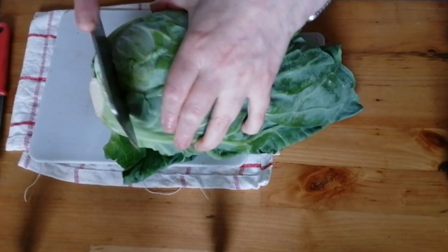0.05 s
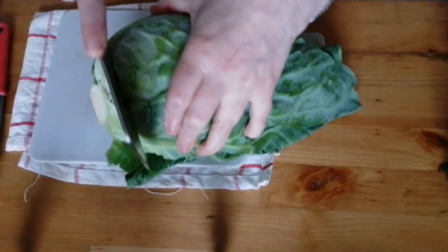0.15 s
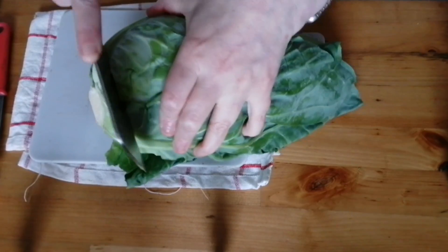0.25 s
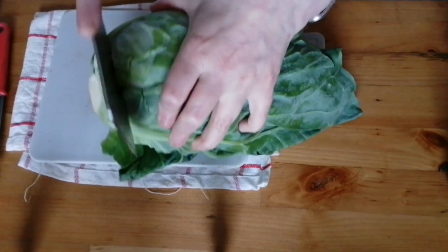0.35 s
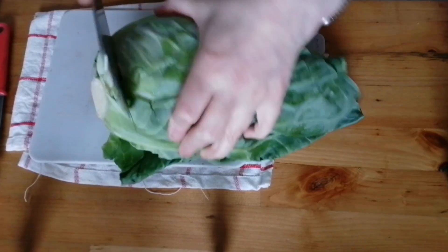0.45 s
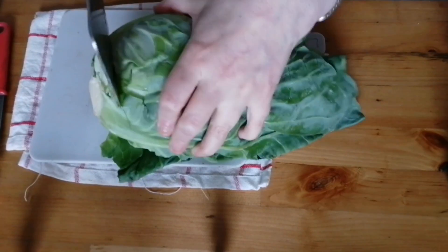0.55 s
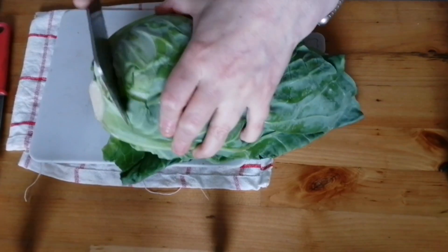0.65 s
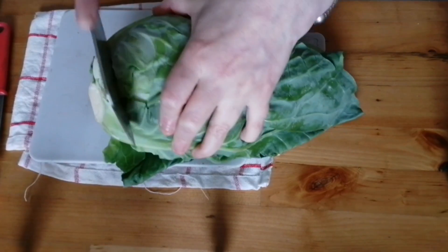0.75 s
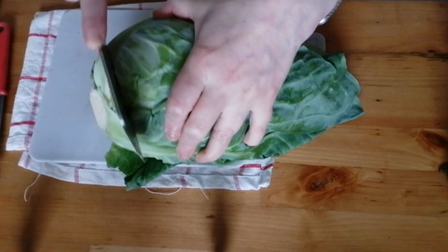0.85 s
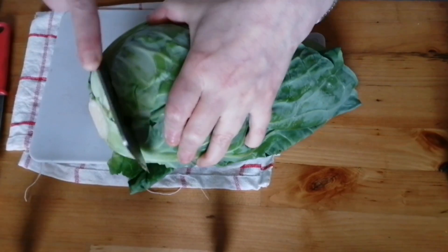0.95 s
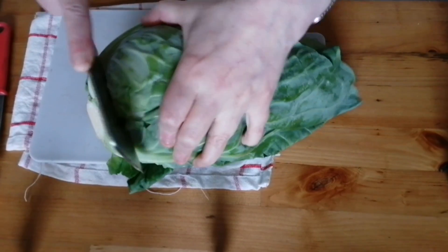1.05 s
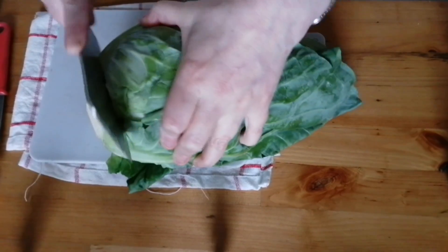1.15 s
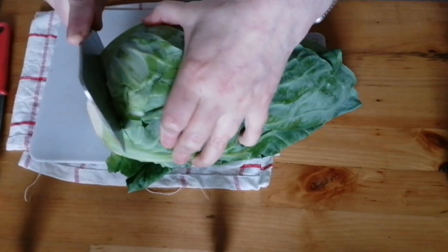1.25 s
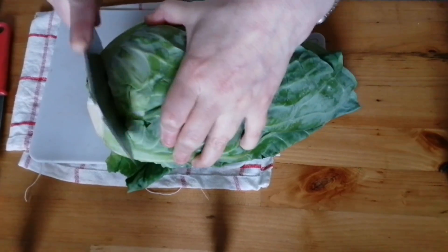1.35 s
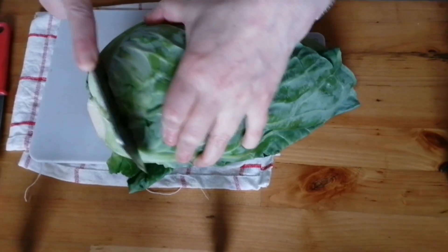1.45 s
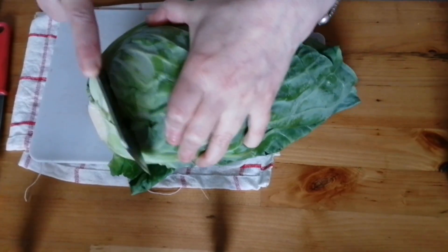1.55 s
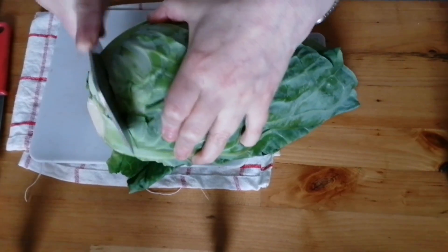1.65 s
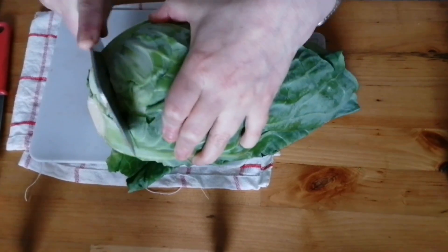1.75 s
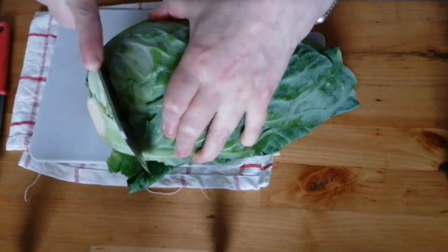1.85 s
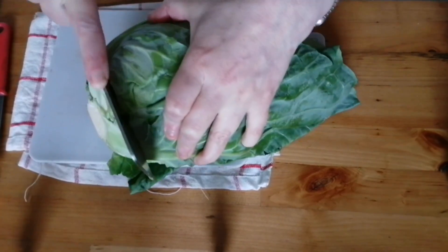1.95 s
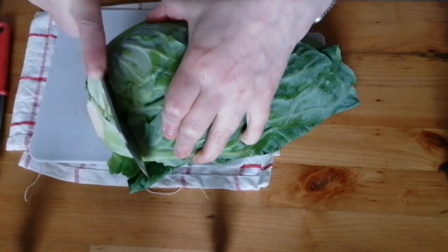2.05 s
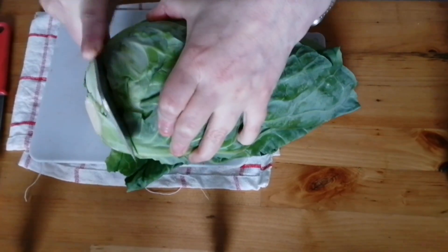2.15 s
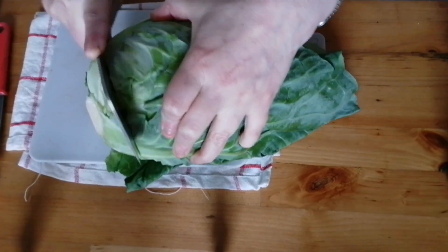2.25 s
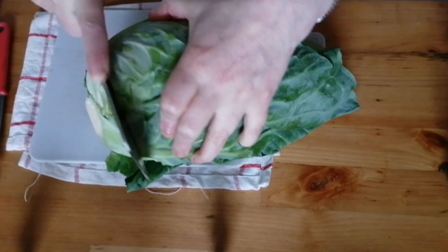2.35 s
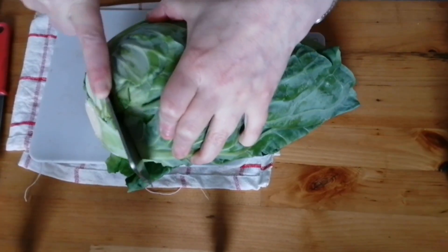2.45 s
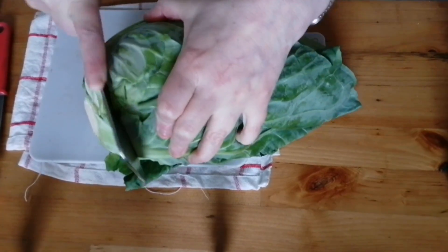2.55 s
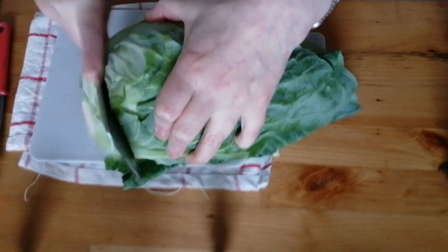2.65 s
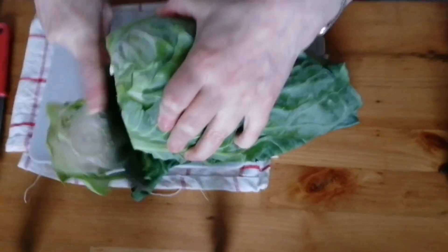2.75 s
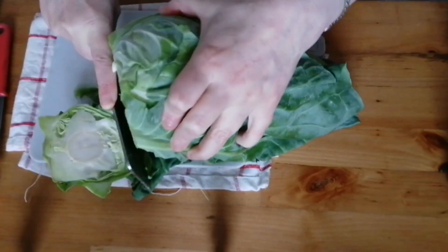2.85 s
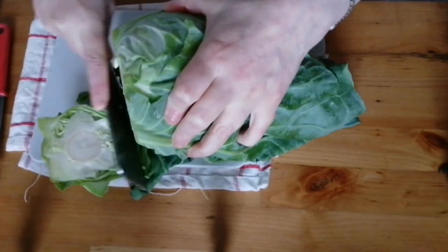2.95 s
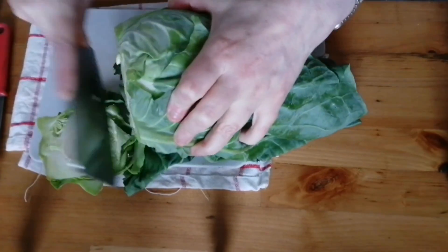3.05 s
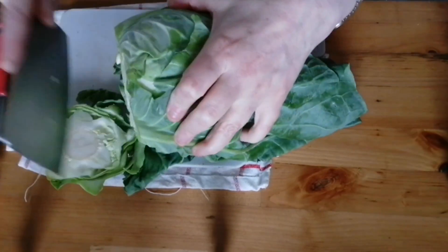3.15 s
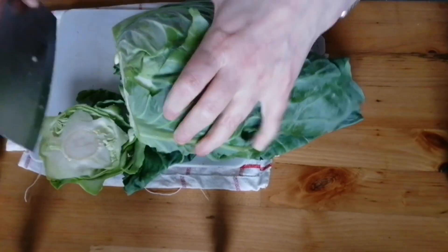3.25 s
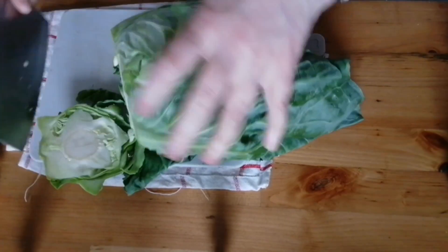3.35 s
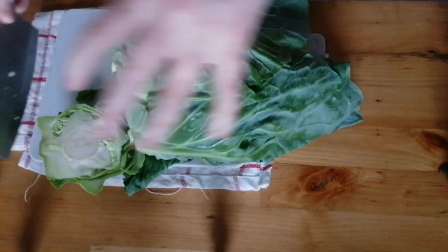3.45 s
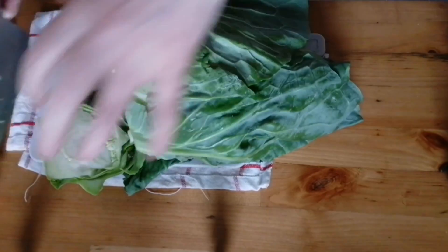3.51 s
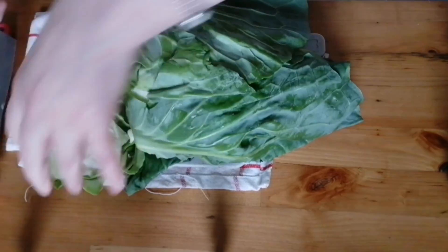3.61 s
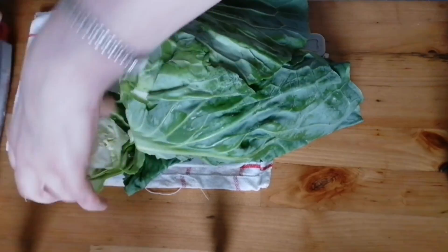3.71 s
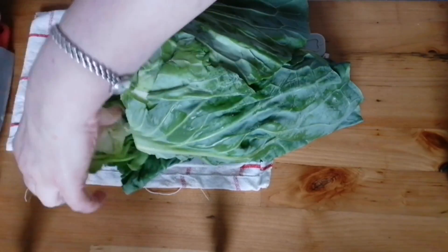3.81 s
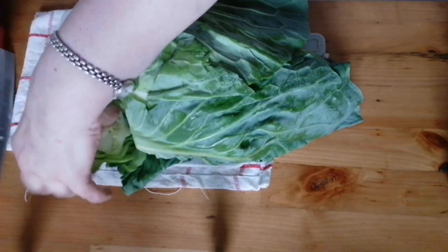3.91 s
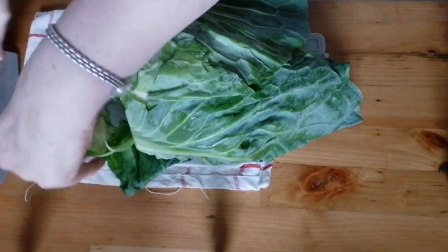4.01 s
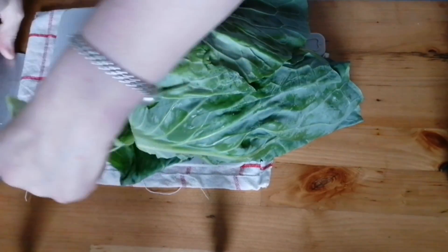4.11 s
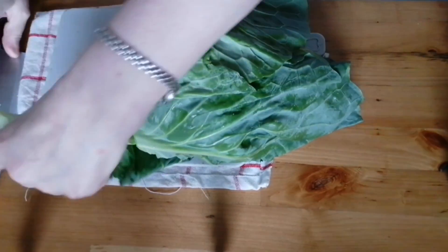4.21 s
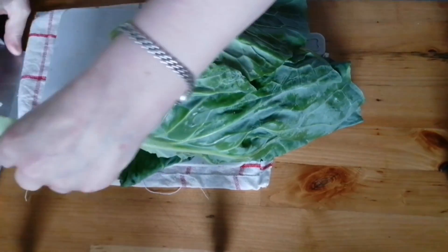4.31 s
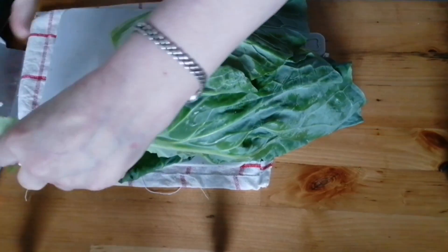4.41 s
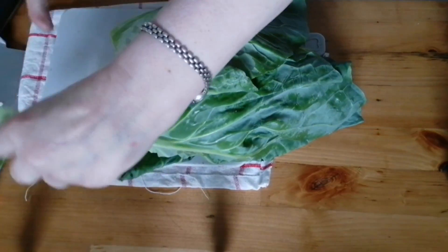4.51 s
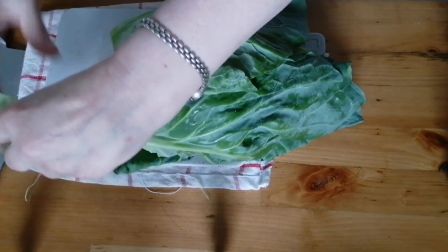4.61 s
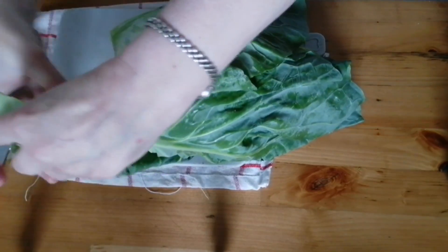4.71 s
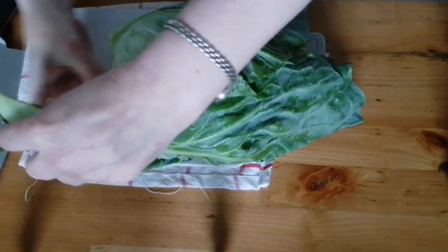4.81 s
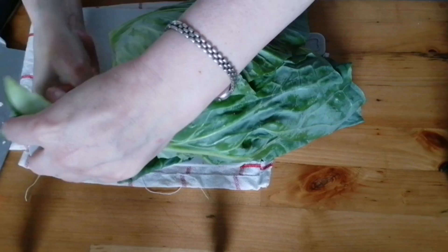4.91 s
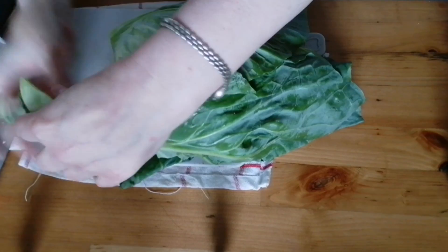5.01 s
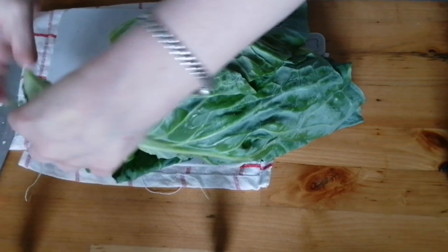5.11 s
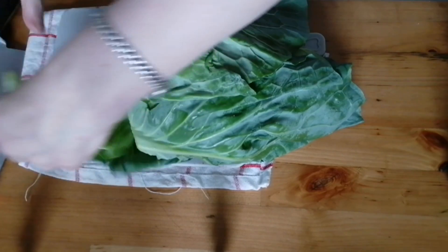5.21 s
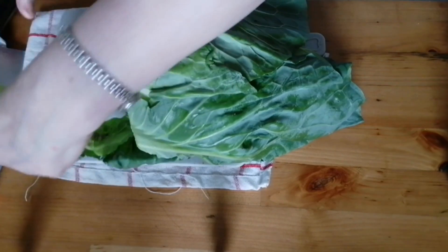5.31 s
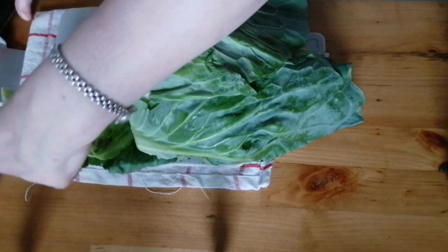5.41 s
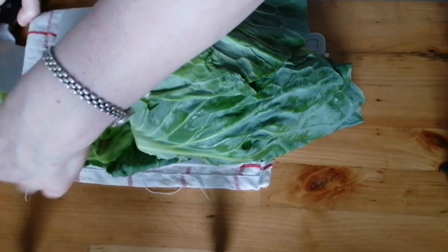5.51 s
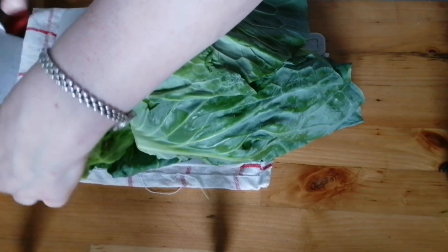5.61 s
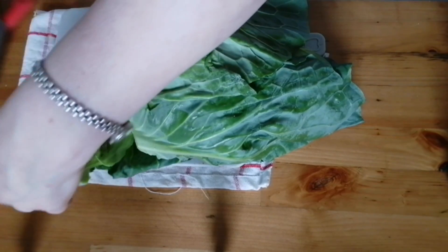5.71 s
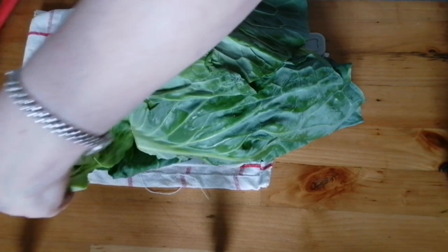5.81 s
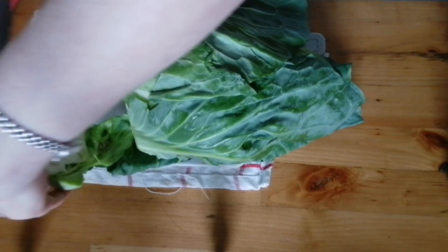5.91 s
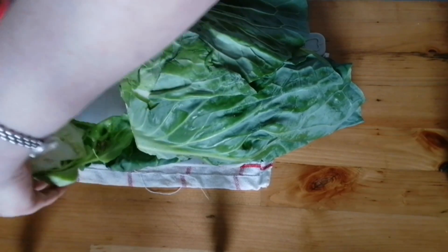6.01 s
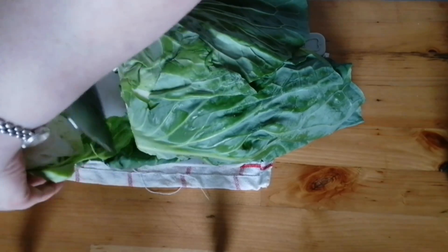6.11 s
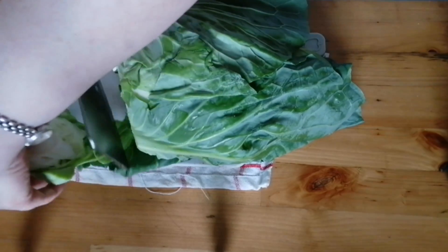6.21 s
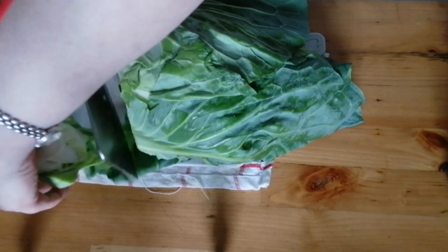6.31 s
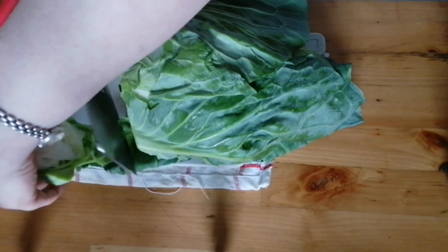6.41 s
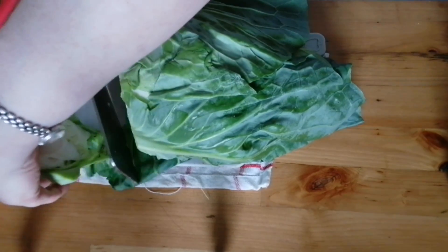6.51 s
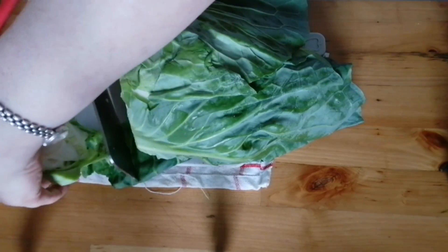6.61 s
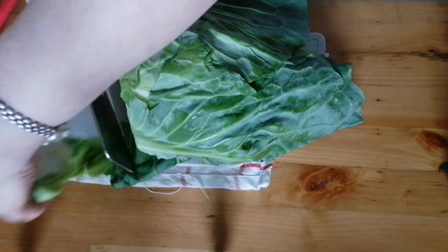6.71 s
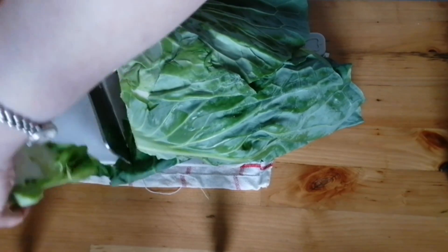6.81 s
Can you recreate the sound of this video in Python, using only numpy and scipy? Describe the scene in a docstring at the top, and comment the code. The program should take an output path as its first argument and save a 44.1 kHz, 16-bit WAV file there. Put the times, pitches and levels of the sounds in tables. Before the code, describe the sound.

Crisp, ragged cutting strokes through firm cabbage end in a loud crack, followed by board knocks, a steel clink and faint leafy snaps.

```python
"""A knife saws through a cabbage stalk: random grains of noise crackle as cells burst, and leaf scraps resonate.
Leaf ribs snap in filtered noise bursts, and blows excite damped modes of a plastic board and, under a towel, a table.
The blade is laid down with a clink, the stump is moved, and the knife is slid off and taken up: the steel rings.
A kitchen's decaying reverberation answers the work, over soft room noise that dips and returns, a faint hum
and a low drone that rises and falls, strongest near 1.3 s."""
import sys
import numpy as np
from scipy import signal
from scipy.fft import rfft, irfft
from scipy.io import wavfile
from scipy.ndimage import uniform_filter1d

SR = 44100
rng = np.random.default_rng(int(sys.argv[2]) if len(sys.argv) > 2 else 0)


def pcm_store(signal):
    """Save signal as 16-bit PCM."""
    levels = np.round(np.clip(np.atleast_2d(signal), -1, 1) * 32767)
    wavfile.write(sys.argv[1], SR, levels.astype(np.int16).T)


N = 302526
TIME = np.arange(N) / SR
AGE = TIME[:SR // 2]  # time since a hit

# Levels in the tables are relative: each source and the room weight them further.
# ribs snapping: start_s, level_db, pitch_hz, lean_db (left minus right, scaled in use), pop_db (hollow head)
RIB_SNAPS = [(.33, -36, 7270, -4, -10), (0.3463, -32.5, 5610, 3, -4.5), (0.7499, -27, 6650, 5, -13),
             (0.7696, -32.5, 6540, 1, -3), (0.833, -34.5, 5250, 11, -25), (0.9283, -35, 3250, 6, -3.5),
             (0.9802, -31.5, 7200, 4, -6.5), (1.0916, -32.5, 6450, -7, -15), (1.1097, -37.5, 2800, 15, -23),
             (1.1394, -32, 2150, 0, -11), (1.176, -35.5, 6350, 9, -21), (1.4569, -33, 5500, 12, -8),
             (1.5488, -27.5, 6660, 1, -5.5), (1.71, -37.5, 6650, 3, -7), (1.8133, -34.5, 5420, 6, -25),
             (1.8463, -32, 7100, 22, -16), (1.8617, -28.5, 5100, -5, -27), (1.9778, -29.5, 6940, 17, -18),
             (2.009, -28, 6460, -1, -30), (2.0862, -30, 8000, -4, -2.5), (2.21, -30, 2800, 3, -10),
             (2.234, -27, 8950, -2, -3.5), (2.2554, -32, 5170, 4, -8), (2.2887, -26, 7260, 6, -1.5),
             (2.378, -29.5, 2340, 11, -5.5), (2.4995, -28.5, 5500, 13, -13), (2.524, -27, 6600, -10, -34),
             (2.7738, -34.5, 2620, 10, -29), (2.826, -23, 2930, 8, -9.5), (2.8567, -19, 5050, 0, -4),
             (2.9134, -27.5, 6060, -12, -18), (3.1362, -38.5, 5500, 7, 2.5), (3.3466, -45, 4810, 2, -30),
             (3.481, -45, 6830, 6, -19), (3.6712, -44.5, 2930, 9, -6), (4.6265, -47.5, 2480, -10, -16),
             (4.6757, -40, 2150, 1, -3.5), (4.7555, -53, 2050, 0, 3), (5.016, -52, 3170, -2, -9),
             (5.475, -55.5, 2200, -1, 0), (6.697, -36, 3330, -12, -29)]
# blows on the board: start_s, board_db, table_db, contact_db (hard clack)
BOARD_BLOWS = [(0.4312, -39, -54, -35), (1.459, -51, -72, -46.5), (2.235, -52, -48, -50),
               (2.291, -49, -50.5, -46), (2.389, -25, -49, -39.5), (2.403, -38, -44, -62),
               (2.9027, -25, -27.5, -26.5), (2.923, -27, -42, -41), (3.929, -37, -59, -48),
               (3.9543, -23.5, -41, -31.5), (4.029, -38, -58, -49), (4.179, -36, -57, -73),
               (4.277, -35.5, -53, -78), (4.304, -31, -46.5, -51), (5.789, -46, -63, -44),
               (5.827, -41, -52.5, -40), (5.844, -42.5, -59, -50), (5.866, -41.5, -53, -46),
               (5.894, -48.5, -73, -39), (6.722, -37.5, -37.5, -32)]
# blade touching down or lifting: start_s, level_db, lean_db (left minus right), ring_db,
# tilt_db (of the ring, per octave), bright_db (treble of the contact)
BLADE_CLINKS = [(3.928, -29, 0.5, -11, -3, 3.5), (4.202, -38.5, 4, -19, -10, 0),
                (4.3036, -25, 0.5, -6, 8.5, -0.5), (5.697, -49.5, -1, -6, 3, -7),
                (5.7416, -42.5, 2.5, -5, -1, -7)]
# normal modes of the plastic board, the table top and the blade: pitch_hz, level_db, t60_s
BOARD_MODES = [(183.6, -24, 0.09), (248.5, -4.5, 0.19), (299.5, 0.5, 0.058), (363.5, 7, 0.058),
               (451, 4, 0.055), (560, -15, 0.034), (664, -12, 0.15), (904, -37, 0.064), (987, -35, .07),
               (1350, -43, .07), (1640, -16, 0.067), (2000, -30, 0.07)]
TABLE_MODES = [(67, 2, 0.09), (88, 7.5, 0.047), (111.5, 2.5, 0.085), (156.6, -6.5, 0.19)]
BLADE_MODES = [(2745, -14, .2), (5500, -11, .14), (6038, 0, .28), (6072, -12, .35), (7950, -13, .25),
               (8010, -11, .32), (8850, -15, .2), (10050, -17, .2), (11550, -22, .15), (13150, -23, .14),
               (14870, -18, .09)]
# spectral shapes of bursting cells, hollow head, friction, hard contact, steel and room noise: pitch_hz, gain_db
CELL_COLOUR = [(300, -34.5), (900, 2), (1500, -2.5), (2100, -4.5), (2900, 2.5), (3900, -7), (5300, 1.5),
               (7000, 2.5), (8700, -1.5), (11000, -10.5), (15000, -18)]
HEAD_COLOUR = [(150, -6), (400, -5), (900, 2.5), (1500, 2.5), (2800, 1), (4000, -14), (9000, -47)]
FRICTION_COLOUR = [(50, -5), (120, 3), (210, 6.5), (400, 2), (580, 8.5), (950, -3), (1500, -15),
                   (3000, -16), (8000, -37.5)]
CONTACT_COLOUR = [(300, -17), (700, 5), (1000, 4.5), (1600, -8), (2200, -13), (2800, -11.5), (4000, -25.5),
                  (7000, -23), (14000, -52)]
STEEL_COLOUR = [(300, -46), (900, 9.5), (2000, -2.5), (2900, 5), (3900, -7.5), (5400, 7), (7800, 4.5),
                (9500, -2), (12500, -10.5), (15000, -7)]
AIR_COLOUR = [(20, -0.5), (42, -19.5), (65, -6), (130, -4.5), (200, -2), (280, -8.5), (370, -4.5),
              (680, -3), (1300, -15), (2100, -22), (3000, -24.5), (3900, -34.5), (5400, -30.5), (7200, -30),
              (10500, -43), (15000, -40.5)]
# envelope of the low drone: time_s, level_db
DRONE_ENVELOPE = [(0, -61), (.25, -58), (.42, -70), (.66, -65), (.95, -48), (1.3, -45), (1.62, -59),
                  (2.2, -65), (3.2, -71), (3.68, -60), (3.95, -72), (4.72, -89), (4.88, -59), (5.05, -66),
                  (5.4, -75), (6.86, -99)]
# spectral lines of the drone: pitch_hz, level_db
DRONE_LINES = [(42.3, -0.5), (85.5, -13), (119, -19.5)]
# envelope of the room noise: time_s, level_db
AIR_ENVELOPE = [(0, -55), (1.9, -58.5), (2.7, -59), (3.6, -56), (6.86, -56)]
# response difference of the two microphones: pitch_hz, left_minus_right_db
MICROPHONE_BALANCE = [(60, 2.5), (130, -0.5), (450, -1.5), (1000, -3), (2200, .5), (3600, -1), (5400, 4),
                      (6500, 3.5), (8000, -5), (9500, -7.5), (12000, -0.5), (15000, 1.5)]
# reverberation of the kitchen: pitch_hz, t60_s, level_db
ROOM_DECAY = [(60, 0.18, 2), (155, 0.6, -2), (400, 0.52, -2), (1190, 0.53, 0), (2980, 0.57, -1),
              (6800, 0.56, -4), (14300, 0.34, -2)]
# pushes of blade or fingers that burst cells: start_s, length_s, level_db, swell_db (start to end), fizz_db
PUSHES = [(0.0, 0.052, -38, -13, -19), (0.105, 0.19, -58.5, 9, -18), (0.298, 0.047, -40.5, 8.5, -10.5),
          (0.491, 0.11, -42, -6.5, -19), (0.614, .055, -42.5, 8, -11.5), (0.752, 0.11, -45.5, 6, -15),
          (0.929, 0.11, -46.5, 2, -15), (1.043, 0.079, -50, -8, -10), (1.277, 0.1, -45.5, 1.5, -14),
          (1.456, .05, -43, -3, -15), (1.551, .095, -55, 8, -7), (1.695, .02, -46, 1, -18),
          (1.765, 0.072, -45, 6, -10), (1.973, 0.1, -51.5, 9, -7), (2.084, 0.06, -41.5, 0, -13),
          (2.23, 0.1, -46, -1, -16), (2.304, 0.044, -48.5, 7, -12), (2.527, 0.07, -47, 7, -8.5),
          (2.846, 0.068, -32.5, 3, -11.5), (3.129, 0.077, -48.5, -2, -13.5), (3.263, 0.21, -57, 2, -15),
          (3.551, 0.066, -59.5, -7, -14), (4.652, 0.04, -56.5, 6, -12), (4.992, 0.027, -66, -2, -12),
          (5.129, 0.023, -63.5, 0, -13), (5.64, 0.078, -61, 8, -16), (6.498, .02, -61, 0, -13)]
# cabbage or knife dragged over the board: start_s, length_s, level_db, swell_db (start to end)
DRAGS = [(0.0, 0.021, -39, -1), (0.307, 0.057, -45.5, 2.5), (0.502, 0.066, -44, -6),
         (0.652, 0.16, -47.5, 1), (0.94, 0.054, -61, -3), (1.298, .05, -50, -1), (1.459, 0.028, -40.5, -9),
         (1.761, 0.084, -49.5, -9), (2.081, 0.061, -45.5, -1), (2.274, 0.066, -48, 8),
         (2.85, 0.059, -39.5, 11), (3.055, 0.091, -42, 6), (3.984, 0.059, -39.5, 12.5),
         (4.428, 0.055, -46, -1), (4.85, .02, -52, 2), (5.653, 0.037, -48, 2), (5.813, .15, -47, -5)]
# blade sliding on the board: start_s, length_s, level_db, swell_db (start to end)
SLIDES = [(4.335, 0.072, -55, -8), (5.76, 0.11, -59, 0), (5.881, 0.058, -60, -3)]
ATTACK_S, RELEASE_S = 0.0041, 0.017  # build-up and decay of hand pressure
TEAR_DB = -13  # tear after each snap, relative to its crack
TOP_HZ = 15400  # upper edge of the microphone passband


def amp(db):
    """Decibel law: level to amplitude gain."""
    return 10 ** (np.asarray(db) / 20)


def unit(x, span_s=None):
    """Normalisation to rms 1, over the whole sound or its first span_s seconds."""
    stop = int(span_s * SR) if span_s else None
    return x / np.sqrt(np.mean(x[..., :stop] ** 2))


def cut(x, hz, kind, order=2):
    """Butterworth high-pass or low-pass filtering."""
    return signal.sosfilt(signal.butter(order, hz, kind, fs=SR, output="sos"), x)


def colour(x, points, size=2048):
    """Minimum-phase filtering: a causal response is built from a spectral shape by folding its cepstrum."""
    hz, db = np.transpose(points)
    log_pitch = np.log(np.fft.rfftfreq(size, 1 / SR) + 1)
    gain = amp(np.interp(log_pitch, np.log(hz), db))
    cepstrum = irfft(np.log(gain))[:size // 2]
    cepstrum[1:] *= 2
    taps = irfft(np.exp(rfft(cepstrum, size)))
    return signal.fftconvolve(np.atleast_2d(x), taps[None], axes=1)[:, :x.shape[-1]]


def noise(count, alike=0, wide_hz=480):
    """Partial coherence: two channels share a part, and long waves reach both microphones alike."""
    alike = np.clip(alike, 0, 1)
    mid, side = rng.standard_normal((2, count))
    side = cut(side, wide_hz, "high", order=1) * np.array([[1], [-1]])
    return np.sqrt((1 + alike) / 2) * mid + np.sqrt((1 - alike) / 2) * side


def add(out, s, x, pan_db=0):
    """Superposition: a sound joins the mix at time s, with a level difference between channels."""
    start = max(int(s * SR), 0)
    x = x * amp(np.array([[pan_db], [-pan_db]]) / 2)
    out[:, start:start + x.shape[1]] += x[:, :N - start]


def ring(modes, detune, skew, tilt_db=0):
    """Modal superposition: damped sines, shifted slightly at each blow and out of phase between microphones."""
    out = 0
    for hz, db, t60 in modes:
        shift, turn = rng.standard_normal(2)
        phase = 2 * np.pi * hz * (1 + detune * shift) * AGE + skew * turn * np.array([[1], [-1]])
        level_db = db + tilt_db * np.log2(hz / modes[0][0])
        decay = np.exp(-np.log(1000) * AGE / t60)
        out = out - amp(level_db) * np.sin(phase) * decay
    onset = 1 - np.exp(-AGE * modes[-1][0] * 2 * np.pi)
    return out * onset


def resonate(x, pitches_hz, gains_db, sharpness):
    """Forced resonance: one signal drives a bank of resonators in parallel."""
    bank = zip(pitches_hz, gains_db)
    return sum(amp(db) * signal.lfilter(*signal.iirpeak(hz, sharpness, SR), x) for hz, db in bank)


def crackle(count, rate, spread_db, grain_s, alike):
    """Shot noise: decaying grains start at random moments (rate per second), most weak and a few strong."""
    fires = rng.random(count) < rate / SR
    size = amp(spread_db * np.minimum(rng.exponential(size=count), 3.7))  # capped strength
    energy = signal.lfilter([1], [1, -np.exp(-2 / (grain_s * SR))], fires * size ** 2)
    return np.sqrt(energy) * noise(count, alike)


def walk(rate):
    """Smoothed random process: a slow wander, with rate random steps per second and a spread near 1."""
    hold = int(SR / rate)
    steps = np.repeat(rng.standard_normal(N // hold + 1), hold)[:N]
    return np.sqrt(2) * uniform_filter1d(uniform_filter1d(steps, hold), hold)


def stroke(start_s, length_s, db, swell_db):
    """Force envelope of one move of the hand: pressure builds, swells or eases while held, and lets go."""
    age = TIME - start_s
    swell = swell_db * (np.clip(age / length_s, 0, 1) - .5)
    attack = np.clip(age / ATTACK_S, 0, 1)
    release = np.exp(-np.maximum(age - length_s, 0) / RELEASE_S)
    return amp(db + swell) * attack * release


def hum(hz, waver):
    """Frequency modulation: a sine of rms 1 whose pitch wanders by the fraction waver."""
    return np.sqrt(2) * np.sin(2 * np.pi * np.cumsum(hz * (1 + waver * walk(6.6))) / SR)


def background():
    """Slowly varying noise and wandering tones: soft room noise, a deep drone and a faint hum."""
    waver_db = .3 * walk(6)
    air_gain = amp(np.interp(TIME, *np.transpose(AIR_ENVELOPE)) + waver_db)
    air = unit(colour(noise(N, alike=0.21), AIR_COLOUR)) * air_gain
    drone = sum(amp(db) * hum(hz, waver=0.012) for hz, db in DRONE_LINES)
    drone = drone * amp(np.interp(TIME, *np.transpose(DRONE_ENVELOPE)))
    return air + drone + hum(hz=201.2, waver=0.00993) * amp(-70.0)


def kitchen(dry, gap_s=0.0013, build_s=0.00043):
    """Reverberation: hard walls answer within milliseconds, and each band decays at its own rate."""
    hz, t60, db = np.transpose(ROOM_DECAY)
    age = np.maximum(TIME[:SR] - gap_s, 0)
    spectrum = rfft(noise(SR))
    log_pitch = np.log(np.fft.rfftfreq(SR, 1 / SR) + 1)
    tail = 0
    for share, seconds, level_db in zip(np.eye(len(hz)), t60, db):
        fade = (1 - np.exp(-age / build_s)) * np.exp(-np.log(1000) * age / seconds)
        band = irfft(spectrum * np.interp(log_pitch, np.log(hz), share), SR)
        tail = tail + amp(level_db) * band * fade / np.linalg.norm(fade)
    return dry + signal.fftconvolve(dry, tail, axes=1)[:, :N]


def scrapes(ring_db=0, grit_db=-3, top_hz=9000):
    """Frictional excitation: the sliding edge catches in tiny jerks that keep the blade singing."""
    jerks = crackle(N, rate=1400, spread_db=5.5, grain_s=0.00034, alike=0.14)
    grit = cut(colour(jerks, STEEL_COLOUR), top_hz, "low")
    hz, db, _ = np.transpose(BLADE_MODES)
    singing = resonate(grit, hz, db, sharpness=300)
    sliding = sum(stroke(*slide) for slide in SLIDES)
    return (amp(grit_db) * unit(grit) + amp(ring_db) * unit(singing)) * sliding


def clinks(chatter_s=0.0029, rebound_s=0.004, rebound_db=-3, count=60):
    """Impact with rebound: steel chatters on what it touches, and the lightly damped blade rings on."""
    out = np.zeros((2, N))
    rebound = (AGE > rebound_s) * np.exp(-np.abs(AGE - rebound_s) / chatter_s)
    touch = np.exp(-AGE / chatter_s) + amp(rebound_db) * rebound
    for s, db, pan_db, ring_db, tilt_db, bright_db in BLADE_CLINKS:
        chatter = colour(noise(len(AGE), alike=0.039) * touch, STEEL_COLOUR)
        # each contact wakes its own set of short-lived bending modes
        pitches, gains_db = rng.uniform(2500, 14500, count), rng.normal(0, 2, count)
        chatter = chatter + resonate(chatter, pitches, gains_db, sharpness=70)
        chatter = colour(chatter, [(8000, 0), (12000, bright_db)])
        blade = ring(BLADE_MODES, detune=.0004, skew=.5, tilt_db=tilt_db)
        clink = unit(chatter, 0.0097) + amp(ring_db) * unit(blade, 0.0025)
        add(out, s, amp(db) * clink, pan_db)
    return out


def blows(contact_s=0.0058, shake_s=0.029, shake_db=-10, board_low_hz=170, hardness=0.26):
    """Impulsive excitation of modes: a blow rings the damped board and table; a hard contact adds a clack."""
    out = np.zeros((2, N))
    for s, board_db, table_db, contact_db in BOARD_BLOWS:
        # a dense, diffuse shudder that follows the board's blow
        shake = colour(noise(len(AGE), alike=0.28) * np.exp(-AGE / shake_s), FRICTION_COLOUR)
        tilt_db = hardness * (contact_db - board_db)  # a harder contact wakes the higher modes
        board = unit(ring(BOARD_MODES, detune=.02, skew=.45, tilt_db=tilt_db), .012)
        board = board + amp(shake_db) * unit(shake, .012)
        board = cut(board, board_low_hz, "high", order=3)  # the board's ring carries no deep bass
        table = unit(cut(ring(TABLE_MODES, detune=0.022, skew=.15), 78, "high"), 0.02)
        clack = colour(noise(len(AGE), alike=0.054) * np.exp(-AGE / contact_s), CONTACT_COLOUR)
        clack = unit(clack, 0.0064)
        add(out, s, amp(board_db) * board + amp(table_db) * table + amp(contact_db) * clack)
    return out


def snaps(crack_s=.0016, tear_s=.022, pop_s=.004, pitch_db=3, pitch_q=4.0):
    """Brittle fracture: a rib cracks at its own pitch, the head pops and the tear runs on through cells."""
    out = np.zeros((2, N))
    for s, db, hz, pan_db, pop_db in RIB_SNAPS:
        crack = colour(noise(len(AGE), alike=0.18) * np.exp(-AGE / crack_s), CELL_COLOUR)
        crack = crack + amp(pitch_db) * signal.lfilter(*signal.iirpeak(hz, pitch_q, SR), crack)
        cells = crackle(len(AGE), rate=750, spread_db=3.2, grain_s=.0005, alike=.25)
        tear = colour(cells * np.exp(-AGE / tear_s), CELL_COLOUR)
        pop = colour(noise(len(AGE), alike=0.16) * np.exp(-AGE / pop_s), HEAD_COLOUR)
        snap = unit(crack, 0.0034) + amp(TEAR_DB) * unit(tear, 0.0083) + amp(pop_db) * unit(pop, 0.0039)
        add(out, s, amp(db) * snap, pan_db * 0.44)
    return out * amp(-8.0)


def leaves(x, flicker_db=5.5, sharpness=17.0, count=24):
    """Sympathetic resonance: leaf scraps ring at their own pitches, and come and go as the blade moves on."""
    pitches = np.geomspace(1200, 9500, count) * (1 + 0.033 * rng.standard_normal(count))
    return resonate(x, pitches, [flicker_db * walk(22.27) for _ in pitches], sharpness)


def cutting():
    """Shot noise through resonators: the blade bursts cells raggedly while the head judders on the board."""
    cells = crackle(N, rate=560, spread_db=4.0, grain_s=.00035, alike=.35)
    crunch = colour(cells, CELL_COLOUR)
    crunch = unit(unit(cut(crunch, 10500, "low", order=4)) + .7 * unit(leaves(crunch)))
    # tougher strands part one by one
    fibres = colour(crackle(N, rate=70, spread_db=4.5, grain_s=0.0017, alike=.3), HEAD_COLOUR)
    crunch = crunch + amp(-11.5) * unit(leaves(fibres))
    fizz = unit(cut(cells, 10500, "high", order=4)) * amp(3.5)  # the finest cells
    bursting = sum(stroke(*push) * (crunch + amp(fizz_db) * fizz) for *push, fizz_db in PUSHES)

    judder = colour(crackle(N, rate=220, spread_db=3.5, grain_s=0.0058, alike=0.82), FRICTION_COLOUR)
    board_hz = np.transpose(BOARD_MODES)[0]
    judder = judder + resonate(judder, board_hz, np.full(len(board_hz), 5), sharpness=22)
    dragging = unit(judder) * sum(stroke(*drag) for drag in DRAGS)
    return bursting * amp(-7) + dragging * amp(-6.5)


def scene():
    """Superposition of sources: the work reverberates in the kitchen, over the background."""
    work = cutting() + snaps() + blows() + clinks() + scrapes()
    return kitchen(work) + background()


def record(dry):
    """Transducer response: each microphone adds its own colour, and a steep low-pass limits the band."""
    channels = []
    for x, sign in zip(dry, (1, -1)):
        channels.append(colour(x, [(hz, sign * db / 2) for hz, db in MICROPHONE_BALANCE]))
    heard = np.vstack(channels)
    return signal.sosfilt(signal.ellip(8, .2, 70, TOP_HZ, fs=SR, output="sos"), heard)


dry = scene()
out = record(dry)
pcm_store(out)
```